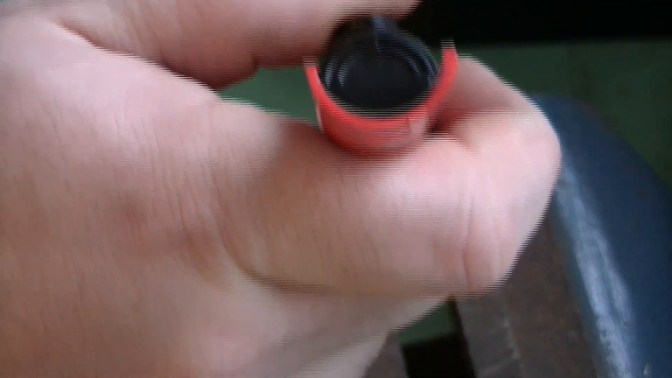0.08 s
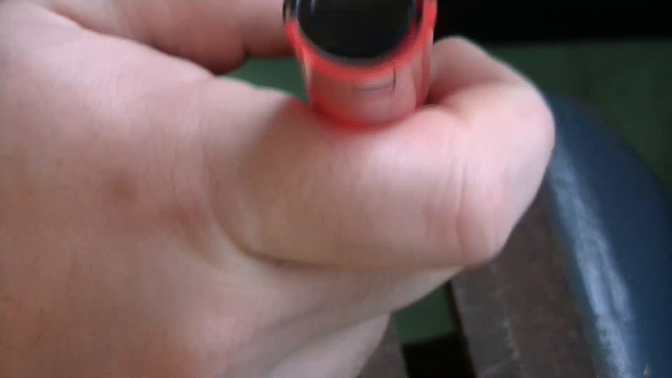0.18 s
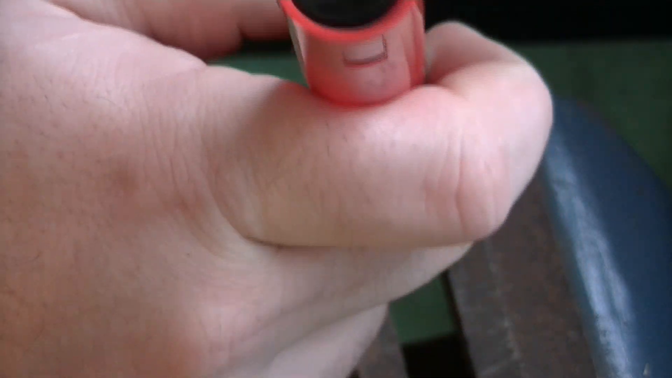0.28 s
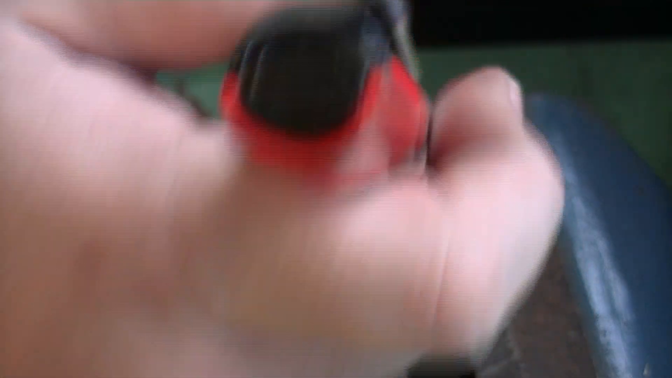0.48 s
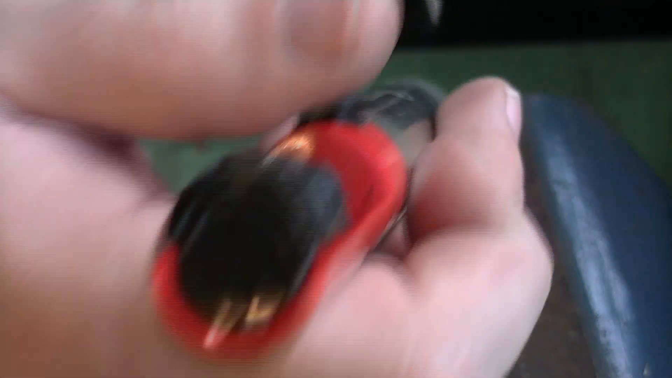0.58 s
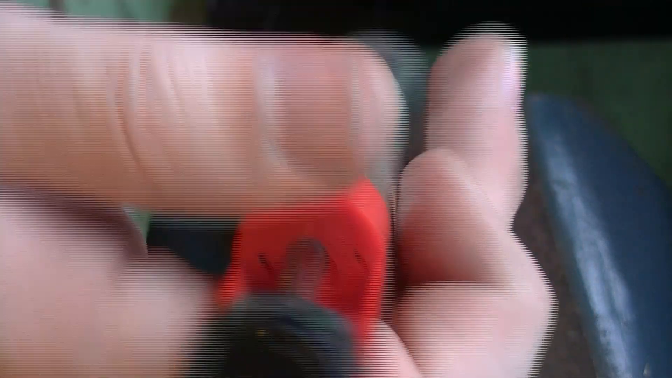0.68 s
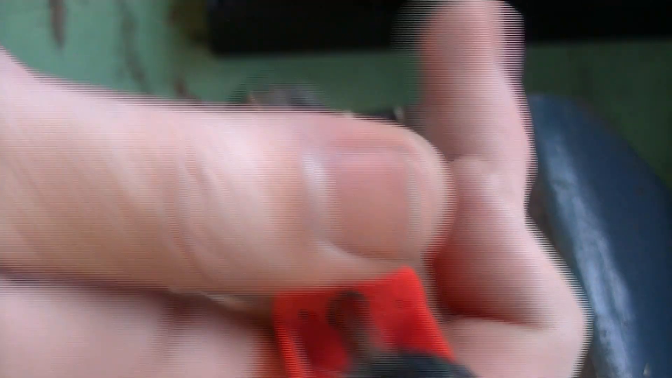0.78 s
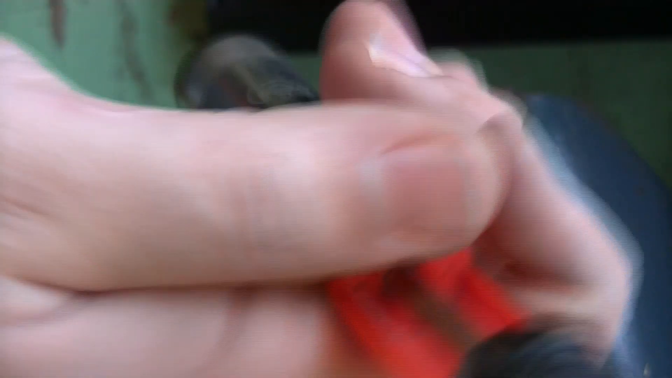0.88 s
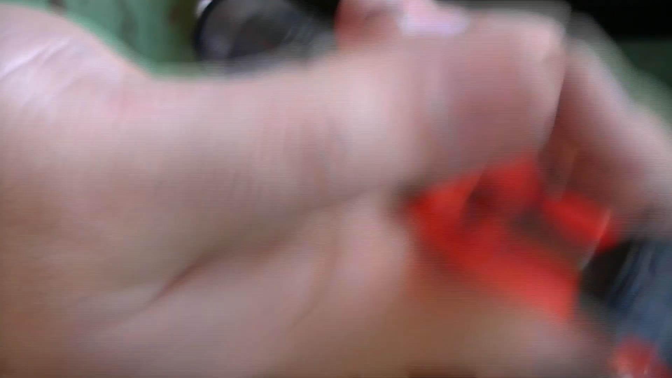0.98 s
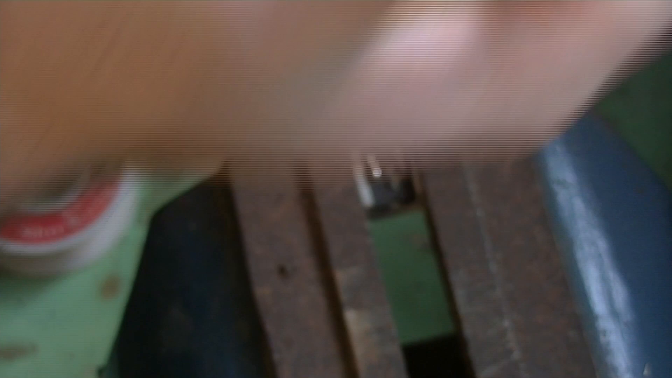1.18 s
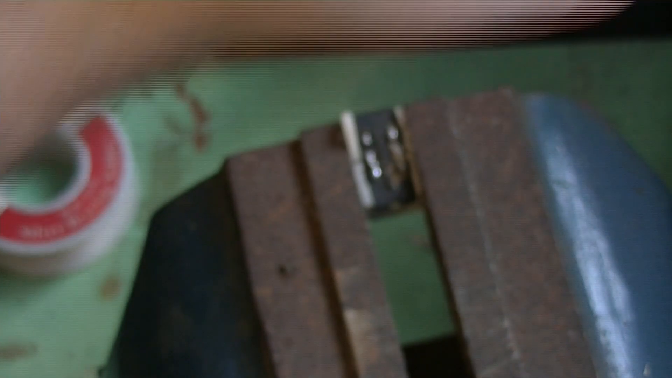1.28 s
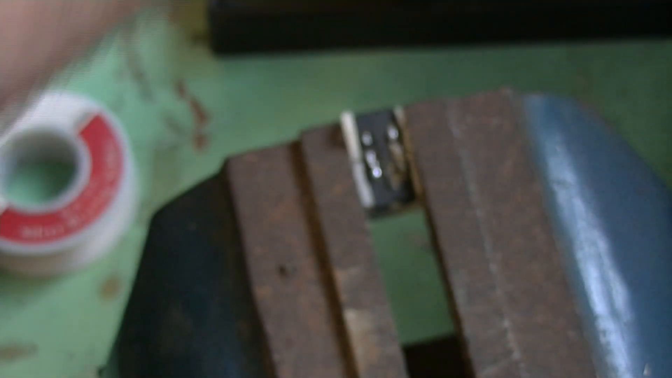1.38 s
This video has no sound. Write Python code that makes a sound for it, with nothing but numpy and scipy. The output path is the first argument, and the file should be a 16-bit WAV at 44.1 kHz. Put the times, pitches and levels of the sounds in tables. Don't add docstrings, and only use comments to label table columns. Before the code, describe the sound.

One loud plastic-and-metal snap from a hand-held solder sucker, with short room ring and faint machine hum.

```python
import sys
import numpy as np
from scipy import signal
from scipy.io import wavfile
from scipy.ndimage import uniform_filter1d

SR = 44100
rng = np.random.default_rng(int(sys.argv[2]) if len(sys.argv) > 2 else 0)


def gain_from_decibels(decibels):
    exponent = np.asarray(decibels, float) / 20
    return 10 ** exponent


def store_pcm(level_fs):
    pcm = np.round(np.clip(level_fs, -1, 1) * 32767).astype(np.int16)
    wavfile.write(sys.argv[1], SR, np.atleast_2d(pcm).T)


N = 61740

# (time [s], peak level [dB], pitch factor [ratio], brightness [dB], ring factor [ratio])
IMPACTS = [(.1964, -26, 0.82, -10, 2.5), (0.1958, -28, .8, -5, 1.8), (0.1987, -18, 0.84, -11, .8),
           (.2010, 5, 1.01, -14, 1.3), (0.2028, 5.5, .88, -3, 1.04), (0.2041, 1, 0.994, -12, 1.12),
           (0.2044, 2, 1.048, 3.5, .9), (.2044, 2, 1.106, -12, .65), (0.2061, -8, 1, -2, 0.72),
           (0.2142, 10.5, .66, -4, .7), (0.2146, -1, 1.15, -6, 0.39), (0.2188, 4, .7, -9, .7),
           (0.2212, -3, 0.47, -12, 1.1), (0.2234, -5, 0.65, -12, 1.1), (0.2254, -3, 0.59, -10, 1.1),
           (.2300, -7, .55, -10, 1.3)]


def evened(x):
    return x / np.sqrt(np.mean(x ** 2) + 1e-20)


def read(points, hz):
    f, value = np.transpose(points)
    return np.interp(np.log(hz + 1), np.log(f + 1), value)


def add(mix, s, sound):
    part = mix[round(s * SR):][:len(sound)]
    part += sound[:len(part)]


def resonate(x, hz, width):
    turn = np.exp(2j * np.pi * hz * np.arange(len(x)) / SR)
    r = np.exp(-np.pi * width / SR)
    return 2 * (turn * signal.lfilter([1 - r], [1, -r], x / turn)).real


def resonate_twice(x, hz, width):
    return evened(resonate(resonate(x, hz, width), hz, width))


def shaped(x, gain_db):
    hz, t, z = signal.stft(x, SR, nperseg=512, noverlap=384)
    z = z * gain_from_decibels(gain_db(hz[:, None], t[None]))
    return signal.istft(z, SR, nperseg=512, noverlap=384)[1][..., :x.shape[-1]]


def knock(pitch, bright_db, ring):
    # (frequency [Hz], level [dB], t60 [s])
    barrel = [(1950, -13, 0.0048), (3325, -6.5, 0.0047), (4100, -5, 0.0066), (5620, -13, 0.0036)]
    # (frequency [Hz], level [dB], t60 [s])
    rod = [(7800, -21.5, 0.005), (8550, -12.5, .004), (10750, -11, .004), (11200, -21, 0.0055),
           (13600, -25, 0.0036), (15100, -32.5, .003)]
    contact_s = 0.0001
    t = np.arange(700) / SR
    out = np.zeros(len(t))
    for hz, db, t60 in barrel:
        out += gain_from_decibels(db - 60 * t / t60 / ring) * np.sin(2 * np.pi * hz * pitch * t)
    for hz, db, t60 in rod:
        out += gain_from_decibels(db + bright_db - 60 * t / t60) * np.sin(2 * np.pi * hz * t)
    return out * (1 - np.exp(-(t / contact_s) ** 2))


def piston():
    out = np.zeros(N)
    for s, db, *colour in IMPACTS:
        add(out, s, gain_from_decibels(db) * knock(*colour))
    return out


def suction_pop():
    pop_s, pop_db, width_s = .1997, -9.5, .0001
    u = (np.arange(N) / SR - pop_s) / width_s
    return -gain_from_decibels(pop_db) * np.exp(-u ** 2 / 2)


def spring_chatter():
    start_s, level_db, t60, ticks_per_s = .2055, -16.5, 0.087, 3700
    t = np.arange(N) / SR
    ticks = (rng.random((2, N)) < ticks_per_s / SR / 2) * rng.standard_normal((2, N))
    fade = gain_from_decibels(level_db - 60 * np.maximum(t - start_s, 0) / t60)
    ticks = ticks * (t > start_s) * fade
    return sum(signal.oaconvolve(k, knock(p, 2.5, .8))[:N] for k, p in zip(ticks, (.72, .95)))


def snap():
    out = piston() + suction_pop() + spring_chatter()
    no_bass = signal.butter(2, 150, "high", fs=SR, output="sos")
    return signal.sosfilt(no_bass, signal.sosfilt(no_bass, out))


def room():
    # (frequency [Hz], level [dB per Hz])
    tail_colour = [(110, -24), (250, -11), (700, -11.5), (1500, -6), (5200, -6), (6600, -15.5),
                   (10500, -20), (16000, -48)]
    # (frequency [Hz], t60 [s])
    tail_t60 = [(150, 0.53), (500, 0.65), (1400, .52), (3500, 0.56), (6000, 0.49), (9000, 0.42),
                (15000, 0.41)]
    # (frequency [Hz], level [dB], t60 [s], build-up [s])
    standing = [(250, -12.5, 0.29, 0.089), (290.5, -30, 0.41, 0.021), (403, -31.5, .5, 0.027),
                (440, -31, .3, .05), (692, -28.5, 0.41, .05), (1081, -26.5, .3, 0.013),
                (1488, -21.5, 0.43, .03), (1713, -24, 0.27, .03), (2170, -22, .3, 0.036),
                (2544, -23, 0.31, 0.023), (2730, -19, 0.34, 0.066), (3270, -24.5, 0.47, .02),
                (3366, -24, 0.4, 0.029), (5110, -20, .3, 0.04)]
    tail_db, rise_s = -16.5, 0.007
    start = IMPACTS[3][0]

    def steady(hz, s):
        return read(tail_colour, hz) + 0 * s

    def dying(hz, s):
        return read(tail_colour, hz) - 60 * np.maximum(s - start, 0) / read(tail_t60, hz)

    t = np.maximum(np.arange(N) / SR - start, 0)
    noise = rng.standard_normal(N)
    level = np.sqrt(np.mean(shaped(noise, steady) ** 2))
    tail = shaped(noise, dying) / level
    out = gain_from_decibels(tail_db) * tail * (1 - np.exp(-t / rise_s))
    for (hz, db, t60, build_s), phase in zip(standing, rng.random(len(standing))):
        swell = gain_from_decibels(db - 60 * t / t60) * np.minimum(t / build_s, 1) ** 3
        out += swell * np.sin(2 * np.pi * (hz * t + phase))
    return out


def fingers():
    # (start [s], length [s], level [dB], frequency [Hz], width [Hz])
    rubs = [
        (0.689, .042, -65.5, 7140, 350),
        (0.729, .012, -56, 2120, 203),
        (1.235, .04, -63, 10600, 2340),
        (1.246, .03, -65, 8980, 300),
        (1.371, .012, -73, 9200, 1500),
        (.695, .01, -70, 11200, 2000),
    ]
    out = np.zeros(N)
    for (s, length, db, hz, width), grit in zip(rubs, rng.standard_normal((len(rubs), 3000))):
        grains = grit[:round(length * SR)] ** 3
        swell = np.sin(np.pi * np.linspace(0, 1, len(grains)) ** 0.81) ** .6
        add(out, s, gain_from_decibels(db) * swell * resonate_twice(grains, hz, width))
    return out


def hum():
    # (frequency [Hz], level [dB], width [Hz])
    upper_orders = [(167.6, -64.5, 19), (262.8, -62, 15.7), (288.7, -64, 10.6), (347.4, -64, 10),
                    (407.5, -65.5, 14), (532, -69.5, 6.9), (583, -71, 14), (677, -70.5, 19),
                    (856, -72.5, 30)]
    low_hz, low_db, beat_hz, beat_null_s = 60, -50, 1.32, .95
    second_hz, second_db, waver_share = 115.5, -47.5, .4
    t = np.arange(N) / SR
    low = 2 * np.sin(np.pi * beat_hz * (t - beat_null_s)) * np.sin(2 * np.pi * low_hz * t)
    waver = resonate_twice(rng.standard_normal(N), second_hz, 8)
    second = np.sqrt(2) * np.sin(2 * np.pi * second_hz * t) + waver_share * waver
    out = gain_from_decibels(low_db) * low + gain_from_decibels(second_db) * second
    for hz, db, width in upper_orders:
        out += gain_from_decibels(db) * resonate_twice(rng.standard_normal(N), hz, width)
    return out


def air(colour, level_db):
    # (frequency [Hz], rise [dB])
    air_grows = [(300, 0), (850, -2.5), (2000, 2.5), (12000, 3)]
    patch_db = 1.5
    patches = rng.standard_normal((257, N // 128 + 8))
    patches = uniform_filter1d(patches, size=4, axis=0)
    patches = evened(uniform_filter1d(patches, size=24, axis=1))

    def gain_db(hz, s):
        grown = read(air_grows, hz) * (np.clip(s / .5, 0, 1) - 1)
        return read(colour, hz) + grown + patch_db * patches[:, :s.size]

    return gain_from_decibels(level_db) * evened(shaped(rng.standard_normal(N), gain_db))


def scene():
    # (frequency [Hz], level [dB per Hz])
    shared_air = [(30, -39), (55, -11), (130, -7), (400, -15.5), (1000, -18), (5600, -29), (6800, -34.5),
                  (16000, -45)]
    # (frequency [Hz], level [dB per Hz])
    side_air = [(18, -38), (30, -3), (113, -3.5), (301, -5), (1420, -13), (3850, -26), (6000, -66),
                (7800, -91), (13200, -120)]
    balance_db = -.45
    tail = room()
    close = snap()
    mid = close + tail + fingers() + hum() + air(shared_air, -50)
    side = air(side_air, -63) + gain_from_decibels(-33.5) * np.roll(tail + close, 5)
    return np.array([mid + side, mid - side]) * gain_from_decibels(np.array([[balance_db / 2], [-balance_db / 2]]))


def low_pass(x):
    return signal.sosfilt(signal.butter(12, 16470, fs=SR, output="sos"), x)


def record(dry):
    duck_from_db, duck_share, recover_db_per_s = -16.5, 0.45, 260.5
    ceiling, rumble_hz, top_hz = .9, 38, 16350
    power_db = 10 * np.log10(signal.lfilter([.01], [1, -.99], (dry ** 2).mean(0)) + 1e-12)
    fall = np.arange(N) * recover_db_per_s / SR
    held_db = np.maximum.accumulate(power_db + fall) - fall
    over_db = np.maximum(held_db - duck_from_db, 0)
    duck_db = duck_share * signal.lfilter([.004], [1, -.996], over_db)
    heard = np.clip(dry * gain_from_decibels(-duck_db), -ceiling, ceiling)
    heard = signal.sosfilt(signal.butter(3, rumble_hz, "high", fs=SR, output="sos"), heard)
    edge = signal.firwin(255, top_hz, window=("kaiser", 9), fs=SR)
    return low_pass(signal.oaconvolve(heard, edge[None], "same"))


dry = scene()
out = record(dry)
store_pcm(out)
```